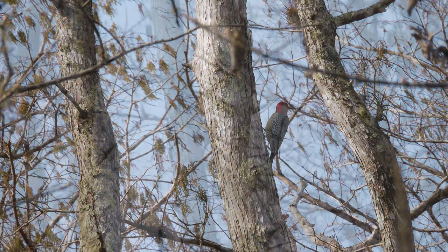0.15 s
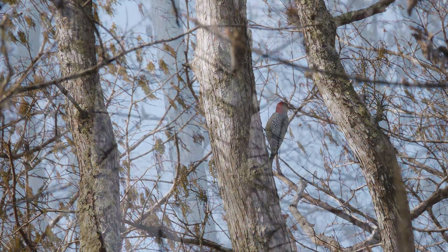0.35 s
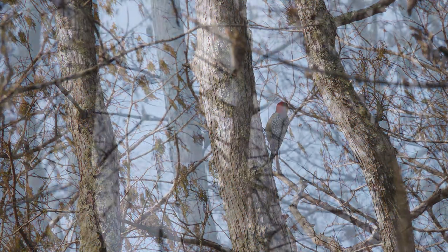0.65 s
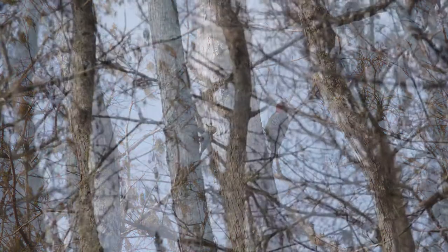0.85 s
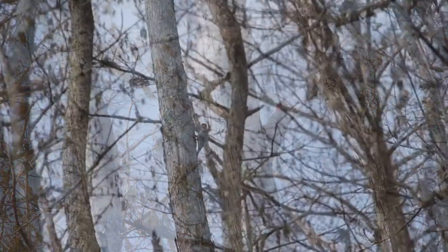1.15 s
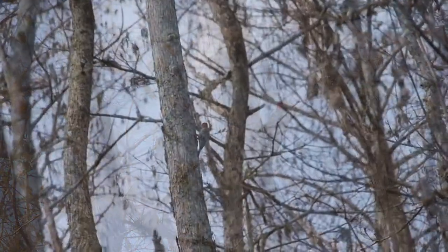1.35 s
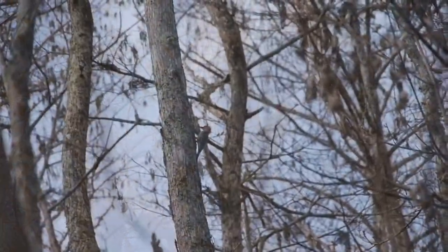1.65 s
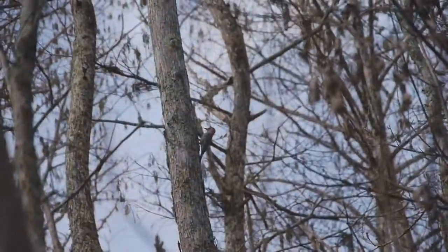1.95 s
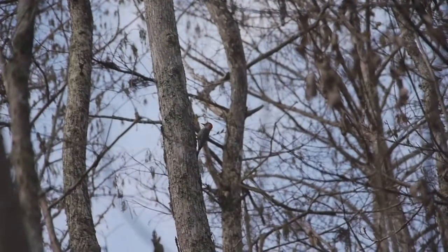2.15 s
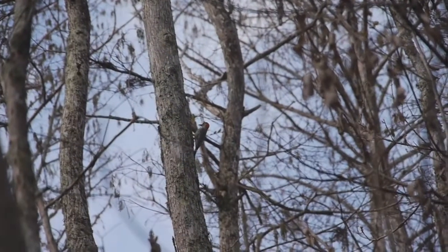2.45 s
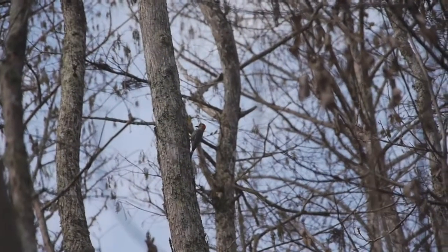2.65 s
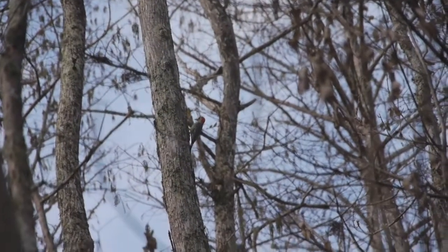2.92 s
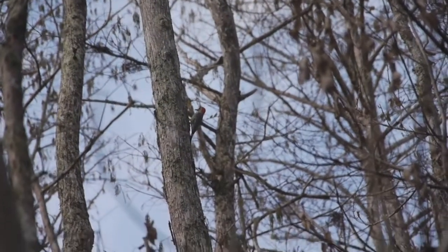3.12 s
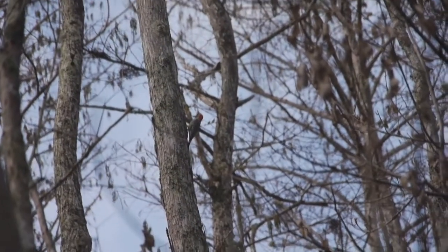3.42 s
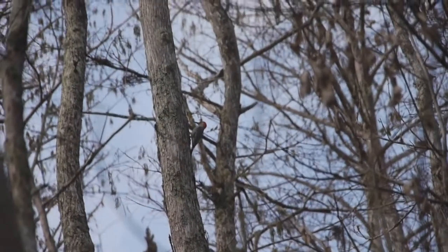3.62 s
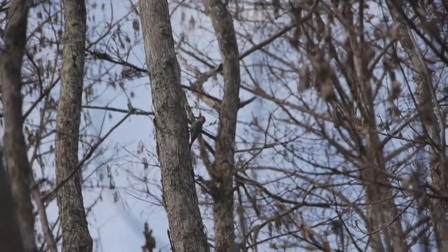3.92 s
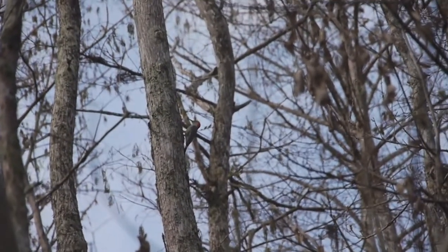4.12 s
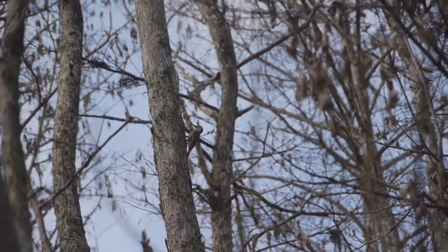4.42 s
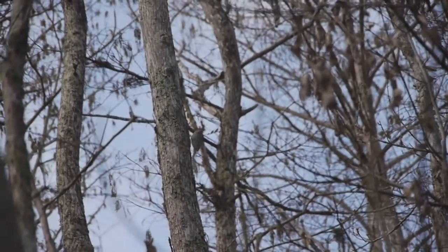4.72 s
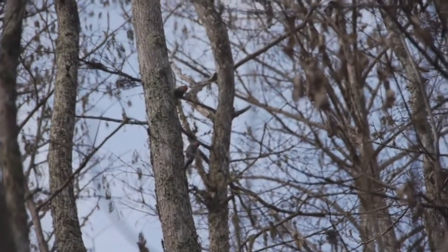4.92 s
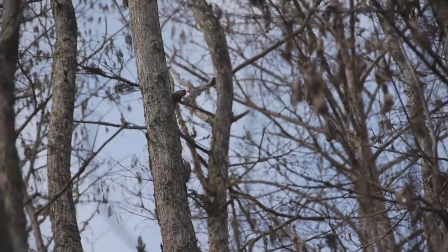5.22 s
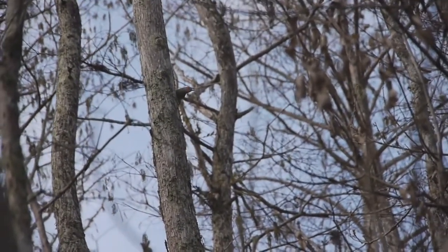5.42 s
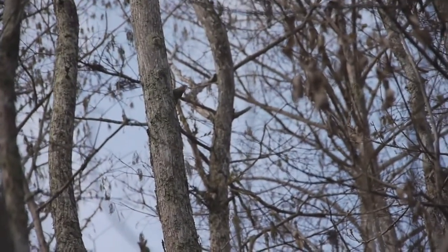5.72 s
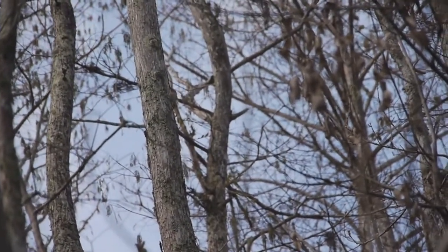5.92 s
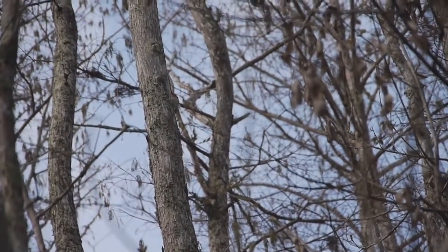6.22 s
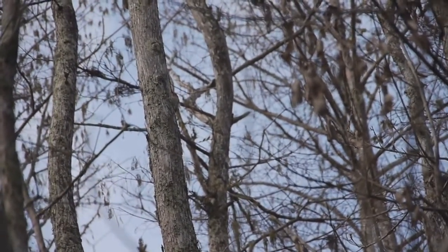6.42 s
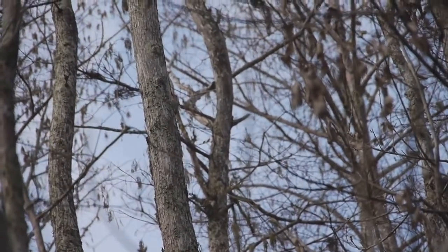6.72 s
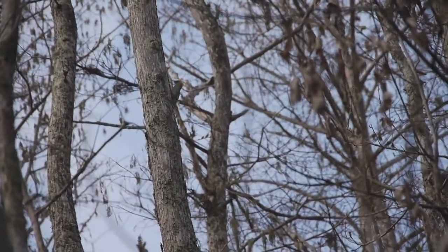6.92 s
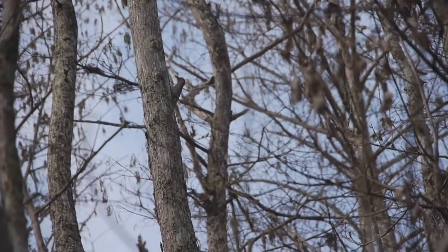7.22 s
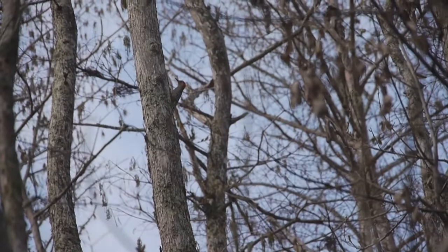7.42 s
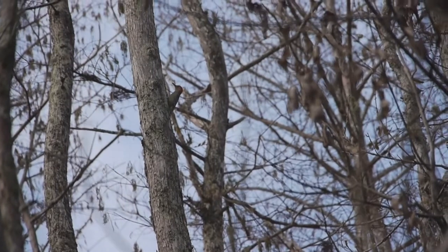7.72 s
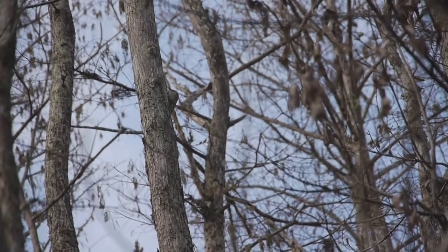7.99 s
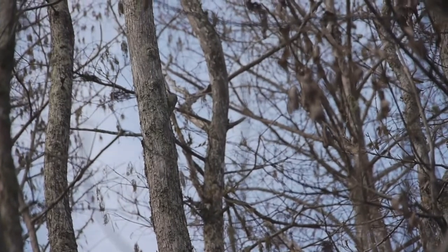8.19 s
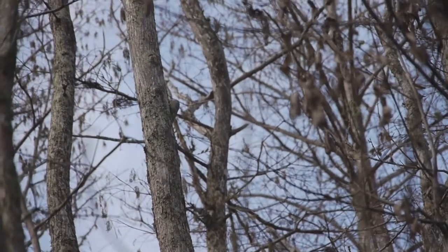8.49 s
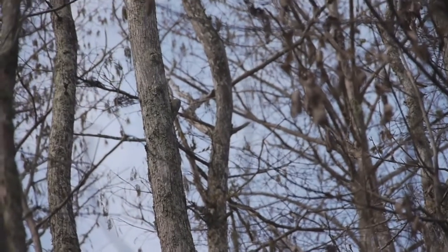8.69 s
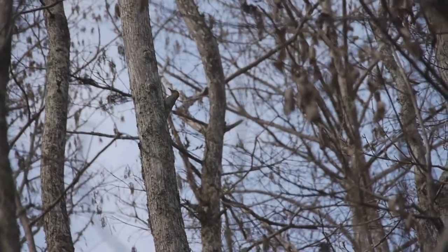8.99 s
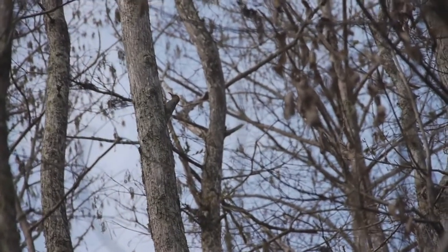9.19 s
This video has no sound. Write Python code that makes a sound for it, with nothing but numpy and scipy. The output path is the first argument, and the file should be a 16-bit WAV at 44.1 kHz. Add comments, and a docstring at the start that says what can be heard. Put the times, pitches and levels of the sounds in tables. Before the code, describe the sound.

Abrupt nasal woodpecker calls ring off tree trunks, with tiny dry ticks and a few dull bumps over quiet, low outdoor air.

```python
"""Woodpeckers a few trunks away in a bare swamp wood give short falling, harsh notes: harmonics of a gliding
pitch plus throat noise, convolved with decaying noise for the long echo scattered by the trunks.
Small dry ticks and a rustle close by are filtered noise bursts; a few dull bumps are a damped sine and a
resonant noise ring. Under them a soft low rush of air and a fine hiss are shaped two-channel noise."""
import sys
import numpy as np
from scipy import signal
from scipy.fft import rfft, irfft, next_fast_len
from scipy.io import wavfile
from scipy.ndimage import uniform_filter1d

SR = 44100
rng = np.random.default_rng(int(sys.argv[2]) if len(sys.argv) > 2 else 0)


def master_out(mix):
    """Clip the mix to full scale and print it as 16-bit PCM to the path in sys.argv[1]."""
    frames = np.transpose(np.atleast_2d(mix))
    ceiling = np.clip(frames, -1, 1)
    pcm = np.round(ceiling * 32767).astype(np.int16)
    wavfile.write(sys.argv[1], SR, pcm)


N = 412335
LEAD_S = .018  # rough, breathy start before the held pitch


def undb(db):
    """Decibels are logarithmic: 20 dB is a tenfold amplitude."""
    return 10 ** (np.asarray(db) / 20)


def on_log(points, hz, column=1):
    """Interpolate a frequency response, hz in column 0, on a log-frequency axis."""
    p = np.array(points, float)
    return np.interp(np.log(np.maximum(hz, 1)), np.log(p[:, 0]), p[:, int(column)])


def walk(rate, size):
    """Low-passed noise: random steps at a rate in Hz, smoothed twice, with spread near 1."""
    k = max(int(SR / rate), 1)
    steps = np.repeat(rng.standard_normal(size // k + 1), k)
    return 1.196 * uniform_filter1d(uniform_filter1d(steps, k), k)[:size]


def add(track, sound, s):
    """Superposition: sum a sound into the track from time s, trimmed to the track's ends."""
    i = int(s * SR)
    a, b = max(-i, 0), min(sound.shape[-1], N - i)
    track[..., i + a:i + b] += sound[..., a:b]


def woodpeckers():
    """Direct sound plus reverberation: each note is heard straight and convolved with the trunks' echo."""
    # The calls: start_s (of the held pitch), level_db, pitch_hz, sag_share, ending_s (low ending),
    # ending_hz, ending_fundamental_db, harshness (0-1), treble_db, echo_db
    calls = [(-.07, -36, 1660, 0.051, .062, 1052, 1, 0.42, -1, -2),
             (0.7201, -30.5, 1646, 0.12, 0.014, 1000, 0, 0.02, 2.5, 0.8),
             (1.16, -29, 1716, .14, 0.033, 926, -1, .04, 0.5, 1.5),
             (1.299, -33.5, 1359, 0.034, 0.093, 953, 0, .13, -1, 3),
             (1.69, -33.5, 1688, .11, 0.09, 1030, -2, 0.13, -3.5, 0.5),
             (1.798, -28, 1653, .11, 0.021, 1000, 1, 0.08, 4.5, -1),
             (3.528, -30, 1378, 0.043, .063, 919, -1.5, 0.11, -2.5, 5),
             (3.912, -36, 1690, 0.091, 0.078, 1000, -2, 0.23, -2, 4.5),
             (4.0959, -26, 1708, .12, 0.02, 1000, 1, 0.01, 2.5, -0.2),
             (4.4678, -26.5, 1640, 0.089, 0.026, 933, -1, 0.04, 5.5, -0.9),
             (5.202, -26.5, 1500, .092, 0.028, 950, -3, 0, 2.5, -.6),
             (5.419, -27.5, 1467, 0.1414, 0.0944, 921, 1, 0.22, 3.5, -2.5),
             (5.5603, -32.5, 1442, 0.038, 0.038, 940, -5, .05, 3.5, 4.5),
             (5.827, -27.5, 1655, 0.045, 0.092, 1047, -0.5, .37, 1.5, -3.5),
             (6.0102, -33, 1472, 0.043, 0.021, 892, -9, .1, 1, 5.5),
             (6.7085, -30.5, 1533, 0.0685, 0.024, 944, -3, 0.01, -1, 5),
             (6.866, -28.5, 1522, 0.19, 0.096, 871, -7, 0.19, 2.5, -0.1),
             (7.226, -30.5, 1705, 0.018, 0.099, 1070, -3, 0.45, 2.5, -2),
             (7.681, -32, 1640, 0.093, 0.019, 1000, -1, 0, 0.2, 5.5),
             (8.0379, -31.5, 1590, 0.094, 0.023, 934, -3, 0.02, 2, 3),
             (8.517, -27, 1474, 0.096, 0.081, 942, -6, .14, 3, -0.5),
             (8.899, -33, 1737, 0.065, .11, 1067, -2, 0.37, -0.5, 2),
             (9.0975, -31.5, 1568, 0.06, 0.021, 937, 2, 0.06, 5.5, 4.5)]
    # Direct sound's interchannel differences: frequency_hz, right_lead_rad, left_minus_right_db
    ear_difference = [(1000, -0.19, -2), (1600, 0.47, -2), (3030, 0.99, -0.5), (4620, -1.85, -1),
                      (6500, -0.3, 4), (8300, 0.96, -2), (10900, -1.56, -2)]
    pan_db = 0.2  # left minus right
    out = np.zeros((2, N))
    sign = np.array([[.5], [-.5]])  # left, right
    for s, db, *shape, echo_db in calls:
        voice = note(*shape)
        hz = np.fft.rfftfreq(len(voice), 1 / SR)
        balance = undb(sign * (pan_db + on_log(ear_difference, hz, column=2)))
        turn = np.exp(-1j * sign * on_log(ear_difference, hz))
        heard = signal.fftconvolve(voice[None], trunks(), axes=1) * undb(echo_db)
        heard[:, :len(voice)] += irfft(rfft(voice) * balance * turn, len(voice))
        add(out, heard * undb(db), s - LEAD_S)
    return out


def note(start_hz, sag, ending, end_hz, low_db, harsh, treble_db):
    """Source-filter voice: throat-coloured harmonics and noise; a sagging pitch drops to a duller low ending."""
    # Throat and beak response: frequency_hz, gain_db (relative)
    throat = [(500, -30), (930, -6), (1150, -13), (1450, -4), (1700, -3), (2200, -3), (3100, -7),
              (3800, -15), (4200, -20.5), (4700, -20), (5600, -28), (6400, -24.5), (8000, -19.5),
              (9000, -37), (10500, -24), (12000, -30), (14000, -34), (16500, -49)]
    t = np.arange(SR // 4) / SR - LEAD_S
    harsh = np.clip(harsh, 0, 1)
    lead_hz = 1859 - 850 * harsh
    over_db = 4 - 6 * harsh  # overtones
    held = .033 - .085 * ending  # s; notes with a long low ending leave the held pitch sooner
    # longer endings are louder and rasp more
    ending_db = -13 + 70 * ending
    rasp_db = -19 + 48 * ending

    # pitch: rough lead-in, sagging hold, quick drop, then a drooping ending that wavers more when harsh
    end_hz = end_hz * (1 - 0.605 * (t - held - ending / 2))
    closing = np.clip(t / held, 0, 1)
    hold = start_hz * (1 - sag * closing ** 1.676)
    drop = np.clip((t - held) / (.013 - 0.0302 * ending), 0, 1)
    lead = np.clip(-t / 0.00595, 0, 1)
    waver = 1 + (.015 + .2 * harsh) * walk(55, len(t))
    hz = (hold + lead * (lead_hz - start_hz)) * (1 - drop) + end_hz * drop * waver
    shake = np.interp(t, [-.006, .002, held, held + .02], [.03, .017, .012, .014 + .06 * harsh])
    hz = hz * (1 + shake * walk(500, len(t)))
    phase = 2 * np.pi * np.cumsum(hz) / SR

    stop = held + 0.0094 + ending
    db = np.interp(t, [-LEAD_S, -.004, .003, 1.13 * held, held + 0.0085, stop, stop + 0.0099],
                   [-32, -10, -2, 0, ending_db, ending_db - 6.5, -70])

    # a harsh voice repeats only every third cycle: lines appear between the harmonics
    thirds = np.arange(1, 52)[:, None]
    k = thirds / 3  # multiple of the fundamental
    share = np.where(thirds % 3 == 0, 1, harsh)
    bright = np.clip(np.log2(k * hz / 3000), 0, 1)
    # the beak closes through the note: overtones lead, the fundamental swells later, the ending is dull
    swell = np.where(k < 1.5, 3.4 * (closing - 1), over_db * (1 - drop) - 3.73 * closing)
    dulling = 18 * drop * np.clip(np.log2(k * hz / 2600), 0, 1)
    ending_colour = drop * np.where(k > 1.5, 4.0, low_db)
    colour = on_log(throat, k * hz) + treble_db * bright + swell - dulling + ending_colour
    # each line breaks up by itself
    flutter = np.array([walk(172.3, len(t)) for _ in thirds]) * (2.6 + 1.86 * bright)
    turn = 2 * np.pi * rng.random(k.shape)
    lines = share * undb(colour + flutter) * (k * hz < 17000) * np.sin(k * phase + turn)
    voice = np.sum(lines, axis=0)

    # turbulent air in the same throat, puffed once a cycle and strongest at the start
    f = np.fft.rfftfreq(len(t), 1 / SR)
    tint = on_log(throat, f) + (treble_db + 10.0) * np.clip(np.log2(f / 2600 + .01), 0, 1) - 8
    breath = irfft(rfft(rng.standard_normal(len(t))) * undb(tint), len(t))
    puffs = 1 + 0.26 * np.sin(phase)
    breath = breath / breath.std() * puffs * undb(rasp_db + 9.2 * lead - 2.1 * drop)
    # as the beak opens, the first air whistles roughly in its narrow gap
    narrow = signal.butter(2, [3400, 4100], "band", fs=SR, output="sos")
    gap = signal.sosfilt(narrow, rng.standard_normal(len(t)))
    opening = np.exp(-((t + 0.0075) / 0.0073) ** 2)
    breath = breath + gap / gap.std() * undb(-9 + 14.4 * harsh) * opening
    return (voice * undb(-3.0 * lead) + breath) * undb(db + 1.7 * walk(116.6, len(t)))


def trunks():
    """Multiple scattering: patchy noise per ear decays at its own rate in each band; the bass is mostly shared."""
    # Echo among the trunks: frequency_hz, t60_s (time to fall 60 dB), level_db (relative)
    wood = [(875, 0.84, 2), (1500, 0.62, -0.5), (2070, 0.77, 0.5), (2570, 0.81, 3.5), (4330, 0.62, 4.5),
            (6000, 0.53, 6.5), (8000, 0.48, 5.5), (12100, 0.47, -2.5)]
    t = np.arange(SR) / SR
    hz = np.fft.rfftfreq(SR, 1 / SR)
    mid, side = rfft(rng.standard_normal((2, SR)))
    # interchannel correlation c
    c = np.clip(on_log([(1200, 0.9), (2500, 0.29), (6000, -0.064)], hz), -1, 1)
    ears = np.sqrt(1 + c) * mid + np.sqrt(1 - c) * side * np.array([[1], [-1]])
    out = 0
    for row, (_, t60, db) in zip(np.eye(len(wood)), wood):
        band = on_log(np.c_[np.array(wood)[:, 0], row], hz)  # triangle: 1 at this row, 0 at its neighbours
        out = out + undb(db - 60 * t / t60) * irfft(ears * band, SR)
    near = 1 + 0.27 * np.exp(-t / 0.036)  # the closest trunks answer first and loudest
    return out * near * undb(-40.5 + 2.12 * walk(61.2, SR)) * np.clip(t / 0.0048, 0, 1)


def ticks():
    """Impulsive noise: brief decaying bright bursts, a little to the right, with a faint patter of smaller ones."""
    # Dry ticks: start_s, level_db (before the band filter)
    tick_list = [(0.317, -45), (0.5911, -52), (0.6863, -53), (1.0755, -48), (2.0348, -42), (2.9711, -47),
                 (3.1797, -46), (3.2121, -46), (4.699, -46), (5.0639, -46), (6.5021, -53), (7.0673, -47),
                 (7.525, -45), (8.757, -38.5)]
    t = np.arange(SR // 20) / SR
    patter = np.c_[rng.random(150) * N / SR, -56 + 2.5 * rng.standard_normal(150)]
    out = np.zeros((2, N))
    for s, db in [*tick_list, *patter]:
        burst = rng.standard_normal((2, len(t))) * undb(-60 * t / 0.016)
        add(out, undb(db) * burst, s)
    bright = signal.butter(2, [6500, 14000], "band", fs=SR, output="sos")
    return signal.sosfilt(bright, out) * undb([[-1.5], [1.5]])


def bumps():
    """Damped resonance: a short decaying sine knocks, then narrow-band noise rings low and uneven."""
    # Dull bumps: start_s, level_db, ring_hz, t60_s
    bump_list = [(5.851, -43, 183, 0.57), (8.183, -36.5, 226, 0.45), (9.009, -42.5, 163, 0.66)]
    t = np.arange(SR // 3) / SR
    out = np.zeros(N)
    for s, db, hz, t60 in bump_list:
        dull = signal.butter(1, [hz / 1.07, hz * 1.15], "band", fs=SR, output="sos")
        burst = signal.sosfilt(dull, rng.standard_normal(len(t)))
        knock = 1.6 * np.sin(2 * np.pi * 1.4 * hz * t) * np.exp(-t / .003)
        ring = undb(-60 * t / t60) * np.clip(t / 0.0021, 0, 1) * burst / burst.std()
        add(out, undb(db) * (knock + ring), s)
    return out


def rustle():
    """Granular friction noise: one faint brush of dry leaves, a swell of dense grains in a broad band."""
    # The brush: centre_s, level_db (before the band filter), spread_s
    brush = (3.0, -63, .04)
    s, db, spread = brush
    grains = rng.standard_normal((2, N)) * undb(4.2 * walk(580, N))
    band = signal.butter(1, [1500, 5000], "band", fs=SR, output="sos")
    swell = np.exp(-((np.arange(N) / SR - s) / spread) ** 2)
    return signal.sosfilt(band, grains) * undb(db) * swell


def air():
    """Partly correlated broadband noise: a low rush that swells slowly over a fine hiss."""
    # Spectrum of the air: frequency_hz, density_db (per Hz, relative)
    air_spectrum = [(15, -49), (25, -17), (141, -2), (216, -3.5), (361, -5), (710, -6), (769, -8),
                    (834, -9), (1510, -17.5), (1640, -18), (1930, -20), (2730, -26), (5520, -35.5),
                    (15800, -43.5)]
    # Level of the rush, rising quickly and then creeping up: time_s, level_db
    rush_level = [(0, -53.5), (1.3, -50), (9.35, -48)]
    # Level of the hiss: time_s, level_db
    hiss_level = [(0, -71.5), (1.3, -65), (9.35, -63.5)]
    # Likeness of the two channels: frequency_hz, correlation
    likeness = [(30, 0.83), (60, 0.82), (130, 0.97), (290, 1), (640, 0.92), (1400, 0.69), (3100, 0.68),
                (6800, 0.19), (15000, 0.34)]
    # Balance of the two channels: frequency_hz, left_minus_right_db
    lean = [(25, 14), (60, -9.5), (125, -1.4), (500, -0.5), (4000, 0.5), (12000, -1)]
    # Phase between the channels: frequency_hz, left_lead_rad
    phase_lead = [(20, -0.5), (300, 0.48), (1300, -.5), (2500, -1.55), (4500, -2.5), (15000, -3.5)]
    size = next_fast_len(N)
    hz = np.fft.rfftfreq(size, 1 / SR)
    mid, side = rfft(rng.standard_normal((2, size)))
    c = np.clip(on_log(likeness, hz), -1, 1)
    sign = np.array([[1], [-1]])  # left, right
    ears = np.sqrt(1 + c) * mid + sign * np.sqrt(1 - c) * side
    ears = ears * undb(on_log(air_spectrum, hz) + sign * on_log(lean, hz) / 2)
    ears = ears * np.exp(1j * sign * on_log(phase_lead, hz) / 2)
    low = 1 / (1 + (hz / 3500) ** 4)  # crossover from rush to hiss
    rush = (low, rush_level, 1.37 * walk(2.975, N))
    hiss = (1 - low, hiss_level, 1.5 * walk(9, N))
    out, t = 0, np.arange(N) / SR
    for part, curve, flicker in (rush, hiss):
        noise = irfft(ears * part, size)[:, :N]
        level = undb(np.interp(t, *np.transpose(curve)) + flicker)
        out = out + noise / noise.mean(0).std() * level
    return out


def scene():
    """Superposition of the birds, the small sounds close by and the air."""
    return woodpeckers() + ticks() + bumps() + rustle() + air()


def record(dry):
    """Band limiting: a high-pass thins the lowest bass and a steep elliptic low-pass cuts the top."""
    thin = signal.sosfilt(signal.butter(2, 33, "high", fs=SR, output="sos"), dry)
    return signal.sosfilt(signal.ellip(10, .2, 80, 15850, fs=SR, output="sos"), thin)


dry = scene()
out = record(dry)
master_out(out)
```